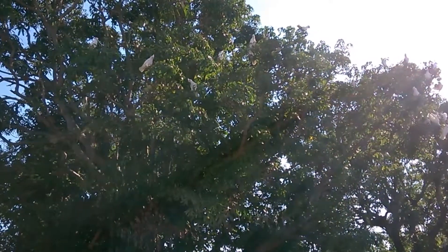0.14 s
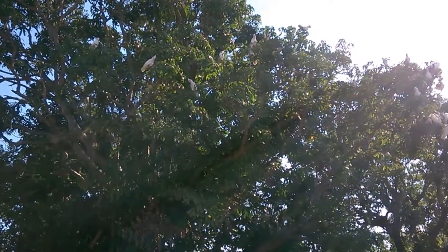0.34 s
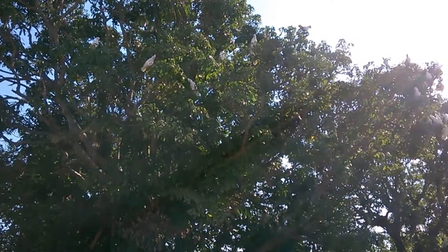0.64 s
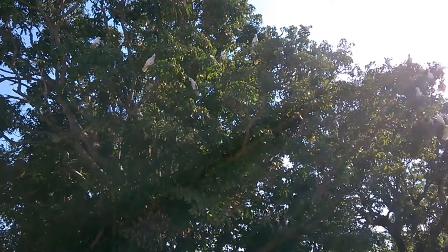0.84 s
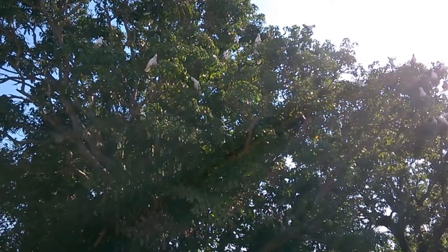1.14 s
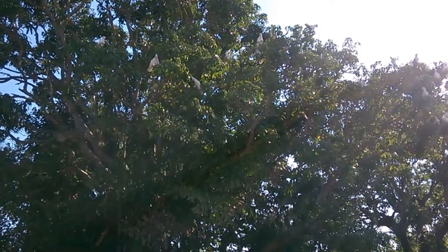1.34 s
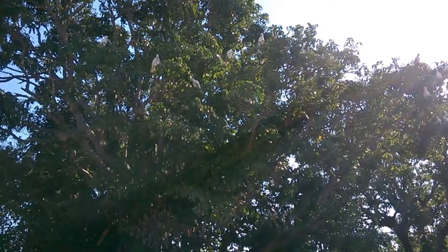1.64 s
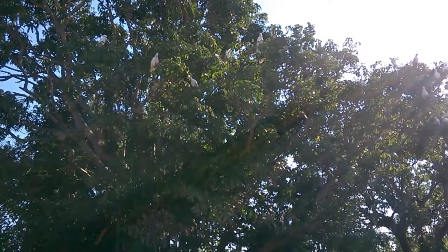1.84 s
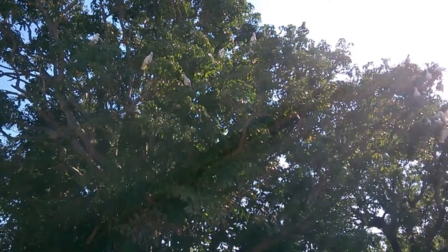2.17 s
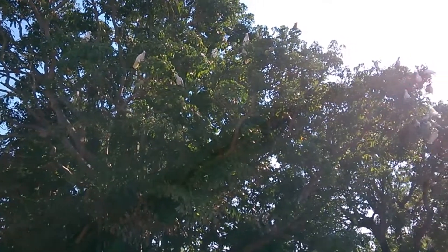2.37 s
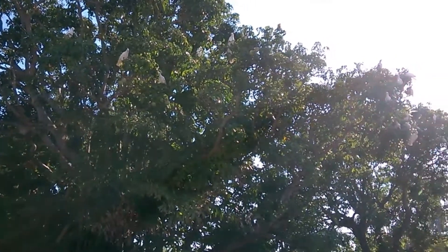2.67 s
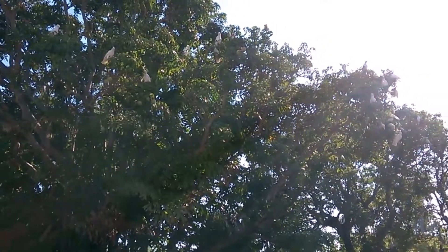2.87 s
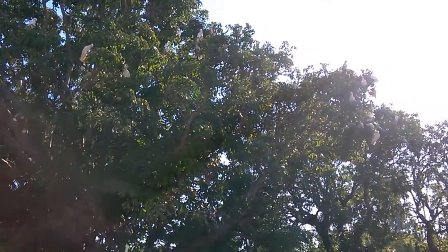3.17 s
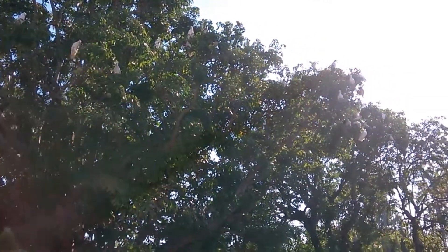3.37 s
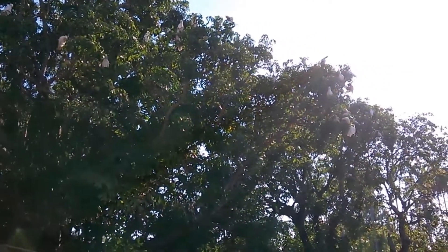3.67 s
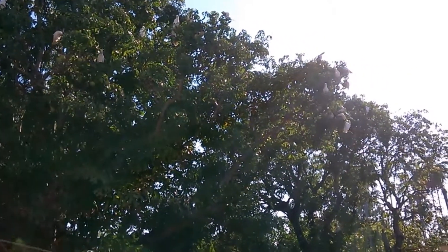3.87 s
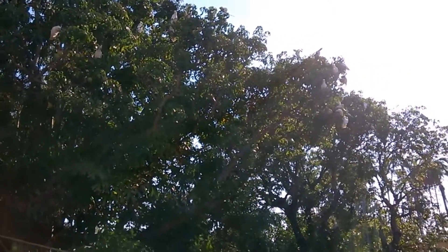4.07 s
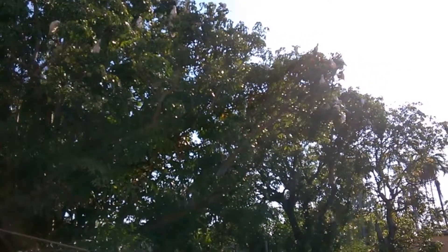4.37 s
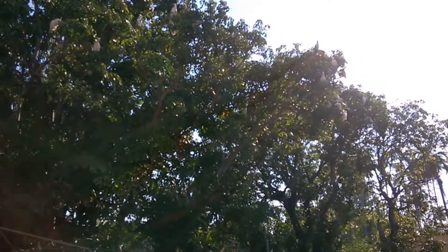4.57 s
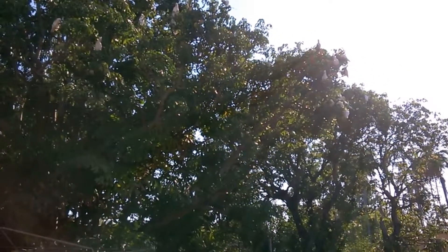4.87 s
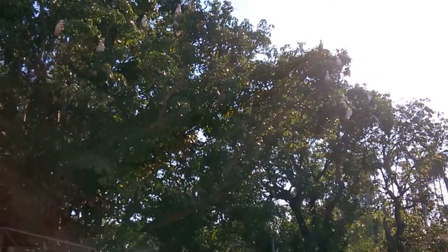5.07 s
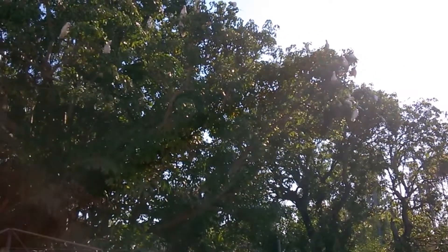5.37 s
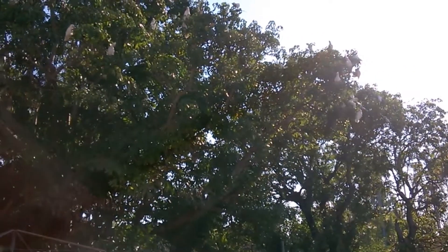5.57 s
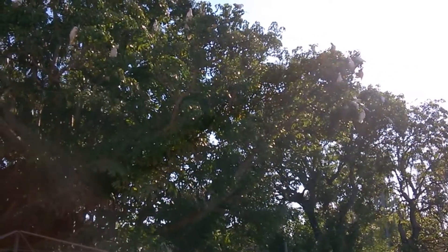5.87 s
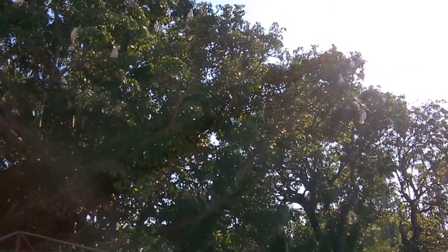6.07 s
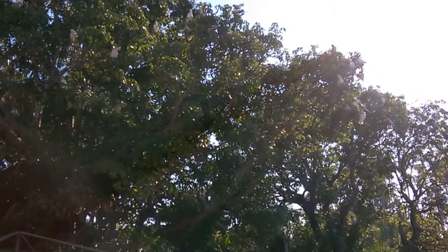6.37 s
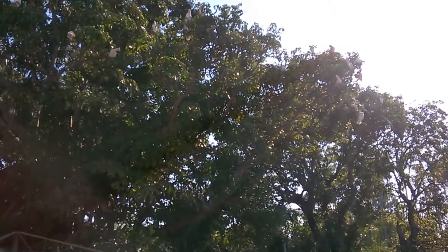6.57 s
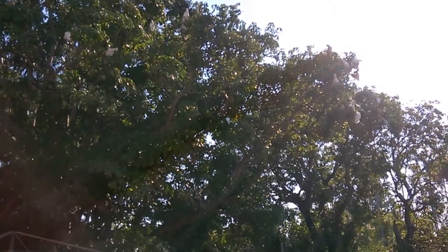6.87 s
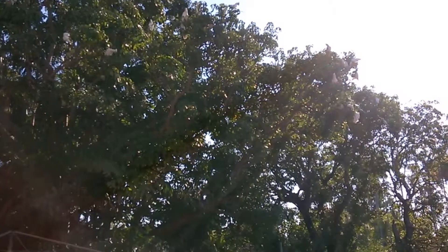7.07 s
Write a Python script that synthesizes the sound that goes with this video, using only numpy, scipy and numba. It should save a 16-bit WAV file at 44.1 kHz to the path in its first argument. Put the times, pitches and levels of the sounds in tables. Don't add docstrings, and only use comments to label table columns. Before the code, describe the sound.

A cockatoo in the treetops gives two harsh, raspy screeches, the second louder, over a heavy engine droning past, tyre roar and low wind rumble.

```python
import sys
import numpy as np
from scipy import signal
from scipy.io import wavfile
from scipy.ndimage import uniform_filter1d
from numba import njit

SR = 44100
rng = np.random.default_rng(int(sys.argv[2]) if len(sys.argv) > 2 else 0)


def elevation(decibels):
    levels = np.asarray(decibels, float)
    return 10 ** (levels / 20)


def materialize(psi):
    bounded = np.clip(np.atleast_2d(psi).T, -1, 1)
    quanta = np.round(bounded * 32767).astype(np.int16)
    wavfile.write(sys.argv[1], SR, quanta)


N = 318534
TIME = np.arange(N) / SR

# time_s, firing_hz, level_db
ENGINE_COURSE = [(0.0, 92.2, -42), (0.06, 91.3, -43), (0.38, 90.8, -32.5), (0.7, 91.1, -43.5),
                 (1.05, 90.8, -27.5), (1.16, 91.1, -33.5), (2.73, 89.4, -24), (2.85, 88.6, -20.5),
                 (3.14, 88.1, -28.5), (3.34, 88.5, -21), (3.72, 86.9, -25.5), (4.28, 86.7, -24.5),
                 (4.66, 85.3, -44.5), (4.91, 85.6, -29.5), (5.25, 85.4, -26), (6.21, 85.4, -30.5),
                 (6.98, 85.5, -44.5), (7.22, 84.6, -36.5)]
# time_s, level_db
BREEZE_COURSE = [(0.0, -2), (.7, 2), (1.1, 1.5), (1.7, 3.5), (2.1, 6), (2.5, 3), (3.5, 2), (4.05, 2),
                 (4.7, -2), (5.7, -2), (6.2, -3), (6.5, -2.5), (7.22, -5.5)]


def unit(x):
    return x / np.sqrt(np.mean(x ** 2))


def curves(table, smooth_s=0.0021):
    s, *columns = np.transpose(table)
    size = int(smooth_s * SR)
    return [uniform_filter1d(np.interp(TIME, s, c), size) for c in columns]


def swells(rows, db, floor_db, values=1, floor_value=1):
    t = TIME[::64]
    bells = np.array([np.exp(-((t - row[0]) / row[1]) ** 2) for row in rows])
    power, floor = elevation(np.array(db)) ** 2, elevation(floor_db) ** 2
    total = power @ bells + floor
    mean_value = (power * values @ bells + floor * floor_value) / total
    return np.interp(TIME, t, 10 * np.log10(total)), np.interp(TIME, t, mean_value)


def walk(rate_hz, size=N):
    k = int(SR / rate_hz)
    held = np.repeat(rng.standard_normal(size // k + 1), k)
    return 1.3 * uniform_filter1d(uniform_filter1d(held, k), k)[:size]


@njit
def svf(x, hz, width_hz):
    y, b, l, g, k = np.empty(len(x)), 0., 0., 0., 0.
    for i in range(len(x)):
        if i == 0 or hz[i] != hz[i - 1]:
            g, k = np.tan(np.pi * hz[i] / SR), width_hz / hz[i]
        v = (b + g * (x[i] - l)) / (1 + g * (g + k))
        b, l, y[i] = 2 * v - b, l + 2 * g * v, k * v
    return y


def band(hz, width_hz, size=N):
    hz = np.ones(size) * hz
    once = svf(rng.standard_normal(size), hz, 1. * width_hz)
    return unit(svf(once, hz, 1. * width_hz))


def dull(x, top_hz, db):
    low_pass = signal.butter(2, top_hz, fs=SR, output="sos")
    return elevation(db) * signal.sosfilt(low_pass, x / np.sqrt(np.sum(x ** 2)))


def screech(warble, blowing, rough_held):
    # centre_hz, width_hz, level_db
    resonances = [(690, 220, -23), (1380, 200, -21), (1600, 170, -13.5), (2050, 250, -14),
                  (2380, 320, -1.5), (2850, 200, -5), (3450, 450, -7), (4150, 350, -5), (4800, 450, -12),
                  (5700, 700, -27), (6500, 900, -35), (8600, 1500, -36), (12050, 300, -44)]
    rough_slide = .13
    on = slice(int(blowing[0][0] * SR), int(blowing[-1][0] * SR))
    effort_db, tilt_db = (c[on] for c in curves(blowing))
    note_hz = curves(warble, smooth_s=.011)[0][on]
    size = len(note_hz)
    rough = rough_held + rough_slide * abs(np.gradient(note_hz)) * SR / 1e4
    hz = note_hz * (1 + .05 * rough * walk(350, size))
    phase = 2 * np.pi * np.cumsum(hz) / SR
    voice = 0
    for k in range(1, 18):
        throat = sum(elevation(db) / (1 + (2 * (k * hz - f) / w) ** 2) for f, w, db in resonances)
        starved_db = 1.1 * (effort_db + 20) * np.clip(k * hz / 3000 - 2, 0, 1)
        beak = elevation(tilt_db * np.log2(k * hz / 2400) + starved_db)
        flutter = elevation(2.2 * walk(60, size)) * (1 + (1.6 + k / 4) * rough * walk(700, size))
        voice = voice + throat * beak * flutter * np.sin(k * phase + rng.uniform(0, 2 * np.pi))
    out = np.zeros(N)
    out[on] = 2.3 * voice * elevation(effort_db)
    return out


def trees(x):
    # top_hz, t60_s, level_db
    foliage = [
        (7500, 0.38, -5.5),
        (2200, 0.45, -11.5),
    ]
    # delay_s, level_db
    returns = [(0.029, -16), (.06, -16), (.085, -20), (.115, -18.5), (.17, -24), (.225, -23.5)]
    t = TIME[:SR]
    response = 0
    for top_hz, t60_s, db in foliage:
        tail = rng.standard_normal(SR) * elevation(-60 * t / t60_s) * np.minimum(t / 0.0019, 1)
        response = response + dull(tail, top_hz, db)
    for delay_s, db in returns:
        smear = rng.standard_normal(SR) * np.exp(-((t - delay_s) / 0.0015) ** 2)
        response = response + dull(smear, 1650, db)
    return x + signal.fftconvolve(x, response)[:N]


def cockatoo():
    # time_s, pitch_hz
    warbles = [
        [(2.94, 814), (2.953, 722), (2.975, 700), (2.996, 718), (3.009, 805), (3.025, 805), (3.046, 652),
         (3.065, 655), (3.1, 732)],
        [(4.119, 800), (4.129, 682), (4.148, 652), (4.201, 818), (4.212, 812), (4.231, 710), (4.265, 682),
         (4.297, 715), (4.321, 796)],
    ]
    # time_s, effort_db, tilt_db_per_octave
    blowings = [
        [(2.91, -58.5, -9), (2.925, -34.5, -10.5), (2.955, -36, 4), (2.995, -28, 2), (3.014, -22, -2.5),
         (3.045, -26.5, -1), (3.07, -23.5, -1.5), (3.118, -24.5, 0), (3.135, -59, -11)],
        [(4.09, -61, -6), (4.107, -34, -0.5), (4.121, -32, -1), (4.135, -26.5, -1), (4.175, -25, 0),
         (4.205, -16, -2), (4.235, -21, -1), (4.342, -19.5, 0), (4.358, -57, 2)],
    ]
    rough_held = (.135, .1)
    return trees(sum(screech(*call) for call in zip(warbles, blowings, rough_held)))


def engine():
    # centre_s, half_length_s, level_db
    strains = [(.42, 0.085, -40.5), (2.252, 0.32, -37.5), (3.709, 0.41, -31.5), (5.002, 0.21, -39.5),
               (6.153, 0.077, -44), (7.196, 0.26, -40.5)]
    # firing_rate_multiple, level_db under the firing tone
    shaft_orders = [(0.499, -16.5), (.75, -22), (1.5, -24.5), (1.75, -23), (2.25, -29), (2.5, -31.5)]
    coasting_db, firm_db, fading_db_per_db = -48.5, -26, 0.33
    hz, firing_db = curves(ENGINE_COURSE, smooth_s=0.05)
    load_db = swells(strains, np.transpose(strains)[2], coasting_db)[0]
    firing_db = firing_db + fading_db_per_db * np.maximum(firm_db - firing_db, 0) * walk(16)
    phase = 2 * np.pi * np.cumsum(hz * (1 + 0.0046 * walk(14))) / SR
    orders = [(1, firing_db + 0.84 * walk(28)),
              (2, load_db - 7.5 + 3.5 * walk(17)),
              (1.25, load_db - 4.0 + 3.8 * walk(14)),
              (1.4, load_db - 8.5 + 3.0 * walk(12))]
    orders += [(k, firing_db + db + 3 * walk(19)) for k, db in shaft_orders]
    return sum(np.sqrt(2) * elevation(db) * np.sin(k * phase + (k != 1) * 1.2 * walk(5.5))
               for k, db in orders)


def whines():
    # start_s, end_s, start_hz, end_hz, level_db
    gear_tones = [(.2, 0.504, 1675, 1734, -52), (0.449, 0.846, 1773, 1870, -51),
                  (.6, 1.492, 1870, 1930, -52.5), (4.998, 7.218, 433, 418, -52.5),
                  (5.7, 6.9, 318, 308, -58), (.45, 1.402, 1382, 1430, -51.5), (4.999, 7.228, 645, 633, -56),
                  (5.45, 5.8, 1925, 1940, -58), (6.2, 6.9, 1855, 1866, -55.5)]
    out = np.zeros(N + SR)
    for start_s, end_s, start_hz, end_hz, db in gear_tones:
        x = np.linspace(0, 1, int((end_s - start_s) * SR))
        size = len(x)
        hz = (start_hz + (end_hz - start_hz) * x) * (1 + .007 * walk(40, 3 * SR)[:size])
        level = elevation(db + 3.5 * walk(24, 3 * SR)[:size])
        tone = level * np.sin(2 * np.pi * np.cumsum(hz) / SR)
        out[int(start_s * SR):][:size] += np.sin(np.pi * x) ** .5 * tone
    return out[:N]


def road():
    # closest_s, half_length_s, roar_db, roar_hz, tread_db
    vehicles = [(0.0, 0.054, -48, 1040, -57), (0.721, .22, -41.5, 1340, -51), (1.151, 0.24, -41, 1300, -50),
                (1.646, 0.2, -41, 1138, -39.5), (2.001, 0.16, -42.5, 1080, -39.5),
                (2.392, .22, -38.5, 980, -39), (2.856, .25, -40, 953, -44), (3.802, .08, -41.5, 954, -53),
                (4.056, 0.17, -48, 1034, -47), (5.215, .2, -42.5, 1230, -56), (6.418, 0.16, -40, 897, -61),
                (6.757, .22, -39, 836, -69), (7.122, 0.19, -34.5, 897, -66)]
    _, _, roar_db, roar_hz, hiss_db = np.transpose(vehicles)
    tyre_db, tyre_hz = swells(vehicles, roar_db, -51.5, roar_hz, 940)
    tread_db = swells(vehicles, hiss_db, -64.5)[0]
    engine_db = curves(ENGINE_COURSE, smooth_s=0.27)[1]
    boom_db = -42.5 + 0.17 * (engine_db + 31) + .3 * (tyre_db + 45)
    boom_noise = unit(band(135, 43) + band(152.5, 68) + 0.42 * band(202.0, 35))
    boom = elevation(boom_db + 0.78 * walk(6.7)) * boom_noise
    roar_noise = unit(band(tyre_hz, 410) + 0.56 * band(1.4 * tyre_hz, 430))
    roar = elevation(tyre_db - 4.5 + 1.7 * walk(9)) * roar_noise
    tread = elevation(tread_db - 5.5 + 3.5 * walk(9)) * band(2000, 1200)
    return boom + roar + tread, boom_db


def chirps():
    # centre_s, length_s, start_hz, end_hz, level_db
    far_calls = [(0.573, .09, 3900, 3500, -53), (1.935, 0.14, 2220, 2020, -42.5),
                 (6.19, 0.05, 4100, 4150, -49.5), (6.235, 0.097, 3930, 2910, -47.5),
                 (6.3, 0.13, 3900, 3250, -49), (6.49, 0.09, 1940, 1960, -45),
                 (6.465, 0.08, 3330, 3274, -45), (6.478, .06, 2700, 2550, -48),
                 (6.465, 0.07, 4800, 4000, -50), (6.455, .05, 6000, 5500, -60), (1.93, .1, 1050, 1030, -47)]
    out, t = np.zeros(N), TIME[:SR // 2] - .25
    for centre_s, length_s, start_hz, end_hz, db in far_calls:
        x = t / length_s
        swell = np.exp(-np.where(x < 0, 9 * x ** 2, 4 * x ** 2))
        hz = start_hz + (end_hz - start_hz) * np.clip(x + .5, 0, 1)
        width_hz = .08 * start_hz + .7 * abs(end_hz - start_hz)
        call = elevation(db) * swell * band(hz, width_hz, size=len(t))
        out[int((centre_s + t[0]) * SR):][:len(t)] += call
    return out


def wind():
    # centre_s, half_length_s, level_db
    gusts = [(0.0, .07, -38), (.24, 0.11, -36), (.54, .06, -36), (1.202, .22, -34), (1.65, 0.22, -31),
             (2.0, 0.31, -39), (2.465, 0.07, -36), (2.9, 0.17, -39), (3.957, 0.054, -40), (5.55, .08, -35),
             (5.76, 0.09, -37), (6.387, 0.081, -45), (6.898, .1, -39)]
    gust_db = swells(gusts, np.transpose(gusts)[2], -44)[0]
    wind_db = gust_db + .3 * curves(BREEZE_COURSE, smooth_s=.06)[0]
    rumble = unit(band(50, 22) + 0.17 * band(19, 11) + 0.66 * band(70, 33))
    return elevation(wind_db + 0.74 * walk(4.4)) * rumble


def leaves(boom_db):
    # band_hz, level_db per Hz
    spectrum = [(250, 2.5), (330, -2.5), (420, 0), (540, -6.5), (650, -0.5), (1000, -2.5), (2000, -5.5),
                (2800, -13.5), (3900, -2.5), (4700, -33.5), (5500, -40.5), (6500, -46), (8000, -35.5)]
    leaf_db = curves(BREEZE_COURSE, smooth_s=.06)[0]
    f, db = np.transpose(spectrum)
    rustle = 0
    for hz in 250 * 2 ** np.arange(0, 5.1, 1 / 4):
        band_db = np.interp(np.log(hz), np.log(f), db) + 10 * np.log10(hz)
        share = min(hz / 3000, 1)
        swell_db = share * (leaf_db - leaf_db.mean()) + 0.87 * (1 - share) * (boom_db - boom_db.mean())
        flicker_db = 1.0 * walk(1.6) + 1.4 * walk(10)
        rustle = rustle + elevation(band_db + swell_db + flicker_db) * band(hz, hz / 4)
    return elevation(-44) * unit(rustle)


def scene():
    road_sound, boom_db = road()
    mix = cockatoo() + engine() + whines() + road_sound + chirps() + wind() + leaves(boom_db)
    return mix[None]


def drop_faint(x):
    # band_hz, threshold_db under the frame level
    masking = [(4400, -60), (5000, -62), (5400, -61), (5700, -59), (6000, -56), (7000, -55), (9000, -56),
               (10000, -57), (13000, -57)]
    f, _, spec = signal.stft(x, SR, nperseg=2048, noverlap=1024)
    bands = spec[:, :1024].reshape(64, 16, -1)
    level_db = 10 * np.log10(np.mean(abs(bands) ** 2, axis=1) + 1e-18)
    frame_db = 10 * np.log10(np.sum(abs(spec[0]) ** 2, axis=0) + 1e-18)
    frame_db = np.maximum(uniform_filter1d(frame_db, size=3), -35)
    hz, under_db = np.transpose(masking)
    limit_db = np.interp(f[8:1024:16], hz, under_db, left=-200)[:, None] + frame_db
    spec[0, :1024] = (bands * (level_db > limit_db)[:, None]).reshape(1024, -1)
    return signal.istft(spec, SR, nperseg=2048, noverlap=1024)[1][:, :N]


def top_cut(x):
    return signal.sosfilt(signal.butter(12, 13000, fs=SR, output="sos"), x)


def record(dry):
    mix = drop_faint(dry)
    return top_cut(mix)


dry = scene()
out = record(dry)
materialize(out)
```